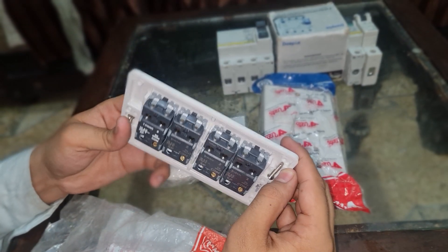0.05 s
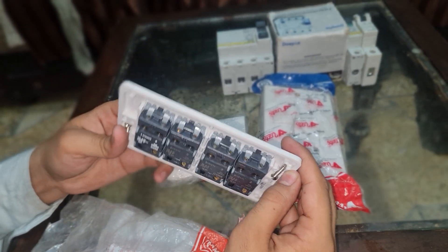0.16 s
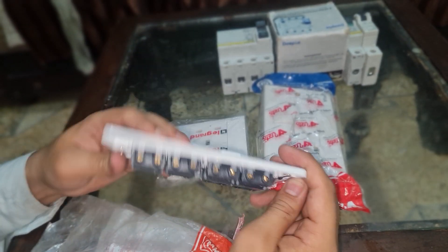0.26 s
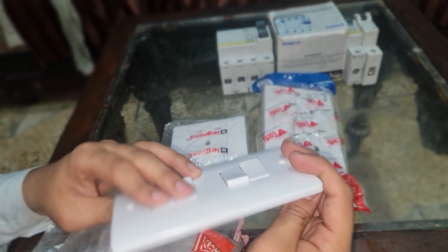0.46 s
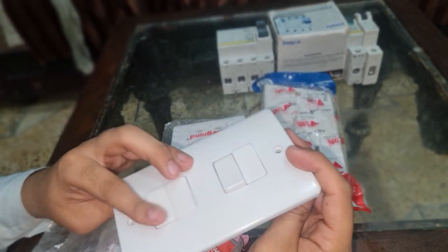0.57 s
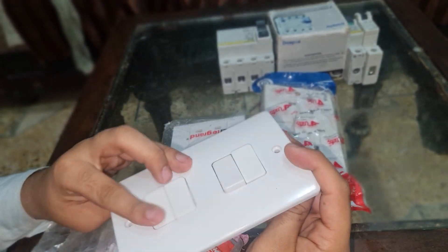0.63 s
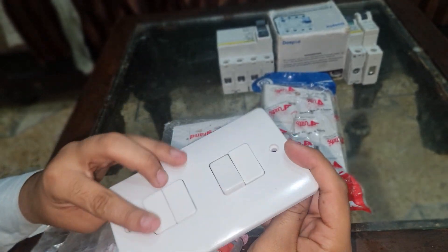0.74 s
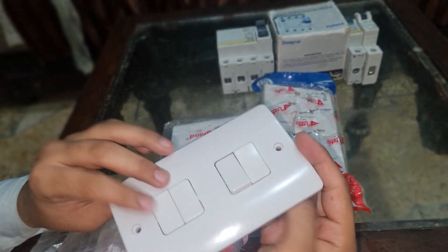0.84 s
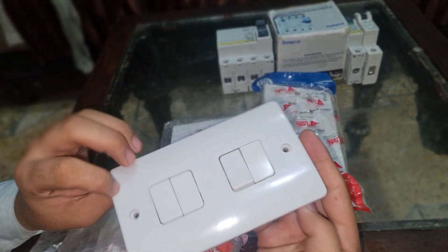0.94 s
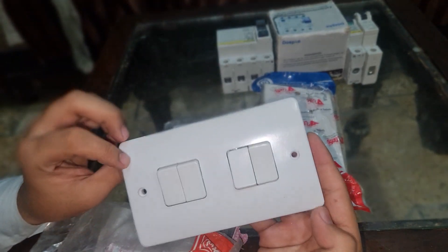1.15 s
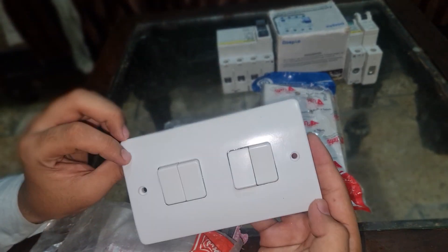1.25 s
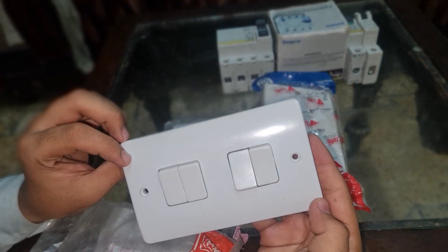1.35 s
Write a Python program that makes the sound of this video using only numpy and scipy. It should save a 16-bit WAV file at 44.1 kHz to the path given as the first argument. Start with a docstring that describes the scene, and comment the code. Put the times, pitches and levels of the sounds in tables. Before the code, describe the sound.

One sharp rocker switch snap, then soft finger scuffs over a low room hum.

```python
"""The echo of an earlier snap fades in a hard-walled room, over high cricket-like chirps, mains hum with its
overtones, a low rumble, a thin fan-like whine and a low rush of air, all of which carry on behind. At 0.21 s a
rocker switch on a hand-held plastic wall plate snaps over, close to the microphone: the rocker hits its stop,
the plastic rings and the room answers. Then the handled plate bumps softly, and fingers scuff, tap and brush
it."""
import sys
import numpy as np
from scipy import signal
from scipy.fft import rfft, irfft
from scipy.io import wavfile
from scipy.ndimage import uniform_filter1d

SR = 44100
rng = np.random.default_rng(int(sys.argv[2]) if len(sys.argv) > 2 else 0)


def unload_audio(sound):
    """Save the sound as a 16-bit wav file, at the path given as the first command line argument."""
    columns = np.transpose(np.atleast_2d(sound))
    # keep every value between -1 and 1, then stretch to whole-number steps
    steps = np.round(np.clip(columns, -1, 1) * 32767)
    wavfile.write(sys.argv[1], SR, steps.astype(np.int16))


N = 61740
LEAD_S = .3  # run-up for sounds that start before time zero
TOTAL = N + round(LEAD_S * SR)
TIME_S = np.arange(TOTAL) / SR - LEAD_S


def amp(db):
    """Decibels to gain."""
    return 10 ** (np.asarray(db) / 20)


def unit_rms(x):
    """Scales to rms 1."""
    return x / np.sqrt(np.mean(abs(x) ** 2) + 1e-20)


def lookup(points, hz, column=1):
    """Interpolates a table column over log frequency."""
    table = np.array(points, float)
    return np.interp(np.log(hz + 1), np.log(table[:, 0] + 1), table[:, column])


def pan(db):
    """Stereo gains: left up by db, right down by db."""
    return amp([[db], [-db]])


def decay(age_s, t60_s):
    """Exponential fall, 60 dB per t60_s."""
    return np.exp(-np.log(1000) * age_s / t60_s)


def swell(centre_s, sigma_s):
    """Gaussian envelope on the scene's time axis."""
    return np.exp(-.5 * ((TIME_S - centre_s) / sigma_s) ** 2)


def add(mix, start_s, sound):
    """Adds a stereo sound to the mix."""
    part = mix[:, max(round((start_s + LEAD_S) * SR), 0):][:, :sound.shape[1]]
    part += sound[:, :part.shape[1]]


def coloured(x, spectrum):
    """Filters x by a spectrum (one gain column, or one per channel), to rms 1."""
    size = x.shape[-1]
    hz = np.fft.rfftfreq(size, 1 / SR)
    gain = amp([lookup(spectrum, hz, column) for column in range(1, len(spectrum[0]))])
    return unit_rms(irfft(rfft(x) * gain, size))


def resonance(centre_hz, width_hz, size=TOTAL):
    """A resonance driven by noise, at rms 1."""
    detune = (np.fft.rfftfreq(TOTAL, 1 / SR) - centre_hz) / (.8 * width_hz)
    spectrum = rfft(rng.standard_normal(TOTAL)) / (1 + detune ** 2)
    return unit_rms(irfft(spectrum, TOTAL)[:size])


# room decay: freq_hz, t60_s
ROOM_DECAY = [(300, 0.73), (1300, 0.3), (2400, 0.37), (3600, .52), (6000, 0.45), (8500, 0.5), (11000, .42),
              (15000, 0.348)]


def room(x, predelay_s=.003, early_db=6.5, early_s=.025):
    """Dense wall reflections, strongest early on, each band dying at its own rate."""
    t = np.arange(int(.8 * SR)) / SR
    reflections = rng.standard_normal((2, len(t))) * amp(early_db * np.exp(-t / early_s))
    hz, age_s, bands = signal.stft(reflections, SR, nperseg=256)
    t60_s = lookup(ROOM_DECAY, hz)[:, None]
    energy_norm = np.sqrt(2 * np.log(1000) / (t60_s * SR))
    bands = bands * decay(age_s, t60_s) * energy_norm
    tail = signal.istft(bands, SR, nperseg=256)[1][:, :len(t)] * (t > predelay_s)
    return signal.fftconvolve(x.mean(0)[None], tail, axes=1)[:, :TOTAL]


# hit on the stop, then rebound: delay_s, gain_db
CONTACTS = [(0, 1), (.0015, -11)]
# modes of rocker and plate: freq_hz, left_db, right_db, t60_s
PLATE_MODES = [(1373, -33.5, -38, 0.0197), (3151, -14, -24.5, 0.02), (3723, -8, -44, 0.0068),
               (4310, -13, -30, .009), (5420, -17, -4.5, 0.0072), (5856, -4.5, -10.5, 0.0087),
               (6200, -17.5, -17, 0.012), (7700, -36, -25, .008), (8242, -23, -8, 0.0083),
               (11505, -16, -30, .01), (11780, -23, -22, 0.0084), (12600, -19, -25.5, 0.0083),
               (14350, -18, -27.5, 0.03), (15340, -24.5, -31.5, 0.0075)]
# contact crack spectrum: freq_hz, left_db, right_db
CRACK_SPECTRUM = [(100.2, -11.5, -26.5), (700, -11.5, -14), (1401.4, -11, -15), (2410, -13, -16),
                  (3130, 3, -14.5), (3700, -5, -17), (4500, -4.5, -0.5), (5900, -4, 1.5), (9200, -2, -3),
                  (10500, -4, -10), (12500, -0.5, -12), (16000, -5, -15)]


def snap(rise_s=.0003, right_lag_s=.00017, crack_db=-11, recoil_db=-31, recoil_hz=130):
    """The rocker hits its stop and rebounds: short plastic modes, a gritty crack, a low recoil."""
    t = np.arange(2048) / SR
    out = np.zeros((2, len(t)))
    for delay_s, gain_db in CONTACTS:
        age_s = np.maximum(t - delay_s - np.array([[0], [right_lag_s]]), 0)
        attack = 1 - np.exp(-age_s / rise_s)
        for k, (hz, left_db, right_db, t60_s) in enumerate(PLATE_MODES):
            ring = (-1) ** k * np.sin(2 * np.pi * hz * age_s) * decay(age_s, t60_s)
            out += amp(gain_db) * amp([[left_db], [right_db]]) * ring * attack
    crack = coloured(rng.standard_normal(out.shape), CRACK_SPECTRUM)
    out += amp(crack_db) * crack * decay(t, t60_s=.013) * (1 - np.exp(-t / rise_s))
    out[0] += amp(recoil_db) * np.sin(2 * np.pi * recoil_hz * t) * decay(t, t60_s=.02)  # left only
    return out


# rocker snaps: start_s, gain_db
SNAPS = [(-.21, 3.5), (0.2143, 1)]
# reflections off table and hands: delay_s, left_db, right_db
NEAR_REFLECTIONS = [(.005, -29, -19), (.0098, -28, -21.5), (.0132, -25, -23), (.0174, -24.5, -22.5)]
# plate radiation as the room returns it: freq_hz, left_db, right_db
ECHO_SPECTRUM = [(300, -14.5, -14.5), (885, -11.5, -12.5), (1340, -1.5, 0.5), (1750, -10, -9.5),
                 (2333, -2, 0), (2800, -4, -4), (3060, 3.5, 5), (3392, 2, 3.5), (4600, -1, 4.5),
                 (5960, 4.5, 14), (6900, -4, 5.5), (8570, -6, 8), (10800, -13.5, 0), (13500, -9, -0.5),
                 (15500, -7.5, -6)]


def switch():
    """Each snap arrives directly, off nearby surfaces and as a diffuse room echo."""
    close, impulses = np.zeros((2, 2, TOTAL))
    for start_s, gain_db in SNAPS:
        click = amp(gain_db) * snap()
        add(close, start_s, click)
        for delay_s, left_db, right_db in NEAR_REFLECTIONS:
            add(close, start_s + delay_s, amp([[left_db], [right_db]]) * click)
        add(impulses, start_s, amp(gain_db) * np.ones((2, 1)))
    hz = np.fft.rfftfreq(TOTAL, 1 / SR)
    echo_gain = amp([lookup(ECHO_SPECTRUM, hz, column) for column in (1, 2)])
    return close + irfft(rfft(room(impulses)) * echo_gain, TOTAL)


# chirps: start_s, length_s, pitch_hz, level_db
CHIRPS = [(-.03, 0.063, 4160, -59), (.178, .025, 4420, -53), (0.648, 0.085, 3920, -64.5),
          (.9, 0.105, 4090, -66.5), (1.093, 0.017, 4185, -50), (1.125, 0.081, 4157, -57.5),
          (1.302, .05, 4090, -69)]
# chirp partials: pitch_ratio, width_hz, gain_db
CHIRP_PARTIALS = [(1, 170, -3), (1.98, 370, -17), (2.98, 500, -15.5), (3.5, 400, -29)]


def chirps(edge_s=.004, tilt_db_per_db=.45, zero_tilt_db=-43, room_db=3, pan_db=-5.5):
    """Shrill, rough chirps of narrow noise bands, brighter when louder, hanging in the room."""
    out = np.zeros((2, TOTAL))
    for start_s, length_s, pitch_hz, level_db in CHIRPS:
        t = np.arange(0, length_s, 1 / SR)
        gate = np.clip(np.minimum(t, length_s - t) / edge_s, 0, 1)
        tilt_db = tilt_db_per_db * (level_db - zero_tilt_db)
        tone = sum(amp(gain_db + tilt_db * (ratio - .5)) * resonance(pitch_hz * ratio, width_hz, len(t))
                   for ratio, width_hz, gain_db in CHIRP_PARTIALS)
        add(out, start_s, amp(level_db) * gate * tone * pan(pan_db))
    return out + amp(room_db) * pan(pan_db) * room(out)


# mains hum envelope: time_s, relative_db
MAINS_ENVELOPE = [(0.0, -48.5), (0.084, -58.5), (0.412, -51.5), (0.79, -50), (0.834, -59), (0.962, -50),
                  (1.044, -56.5), (1.114, -52.5), (1.146, -59.5), (1.4, -50)]


def mains_hum(pitch_hz=100.1, waver=.33, gain_db=-1.5, pan_db=-1.44):
    """A low, wavering mains tone that swells and dips."""
    tone = np.sqrt(2) * np.sin(2 * np.pi * pitch_hz * TIME_S) + waver * resonance(pitch_hz, width_hz=12)
    level_db = np.interp(TIME_S, *np.transpose(MAINS_ENVELOPE)) + gain_db
    return amp(level_db) * tone * pan(pan_db)


# rumble, hum overtone and whine lines: freq_hz, width_hz, level_db, pan_db
HUM_LINES = [(39, 5, -62, -5), (198.56, 3, -64.5, 1), (301.8, 4, -68.5, -0.5), (410.8, 23, -66, 1.5),
             (601, 24, -67, 5), (1943.3, 31, -68.5, 4), (3980, 200, -71.5, -1.5)]


def hum_lines():
    """Narrow noise bands waver as a low rumble, the overtones of the hum and a thin fan-like whine."""
    return sum(amp(level_db) * pan(pan_db) * resonance(hz, width_hz)
               for hz, width_hz, level_db, pan_db in HUM_LINES)


# air spectrum: freq_hz, relative_db
AIR_SPECTRUM = [(20, -20.5), (55, -8.5), (80, -12.5), (135, -9), (230, -12), (420, -10.5), (520, -14.5),
                (680, -13), (880, -24.5), (1600, -21.5), (2200, -22.5), (2700, -28.5), (3600, -29.5),
                (4800, -36.5), (6000, -39.5), (9000, -50), (16000, -59)]
# left-right likeness of the air: freq_hz, correlation
AIR_CORRELATION = [(60, 1), (180, 0.9), (550, 0.43), (1650, -0.32), (4970, -0.31), (15000, 1)]


def air(level_db=-53, patch_db=1, pan_db=-.78):
    """Low rush of moving air, slightly patchy, nearly mono in the bass."""
    hz = np.fft.rfftfreq(2048, 1 / SR)
    left_re, left_im, other_re, other_im, patches = rng.standard_normal((TOTAL // 512 + 5, len(hz), 5)).T
    patches = uniform_filter1d(patches, size=20, axis=0)  # across frequency
    patches = unit_rms(uniform_filter1d(patches, size=8, axis=1))  # across time
    correlation = lookup(AIR_CORRELATION, hz)[:, None]
    left = left_re + 1j * left_im
    right = correlation * left + np.sqrt(1 - correlation ** 2) * (other_re + 1j * other_im)
    bands = np.array([left, right]) * amp(lookup(AIR_SPECTRUM, hz)[:, None] + patch_db * patches)
    rush = signal.istft(bands, nperseg=2048, noverlap=1536)[1][:, :TOTAL]
    return amp(level_db) * pan(pan_db) * unit_rms(rush)


# handling bumps: centre_s, pitch_hz, level_db
BUMPS = [(.39, 39.3, -44.5), (1.097, 70, -46), (1.349, 58, -53.5)]


def bumps(width_cycles=.8):
    """Handling the plate gives brief, soft pushes of low sound."""
    out = np.zeros(TOTAL)
    for centre_s, pitch_hz, level_db in BUMPS:
        cycles = pitch_hz * (TIME_S - centre_s)
        out += amp(level_db) * np.sin(2 * np.pi * cycles) * np.exp(-(cycles / width_cycles) ** 2)
    return out


# finger scuffs: centre_s, sigma_s, rub_db, squeak_db
SCUFFS = [(0.424, 0.0017, -52.5, -54.5), (0.549, 0.008, -66.5, -68), (.861, 0.0061, -62, -61.5),
          (1.048, 0.0068, -56.5, -63.5), (1.062, .005, -54.5, -73)]
# rub spectrum: freq_hz, relative_db
RUB_SPECTRUM = [(400, 0), (1300, 6.5), (2200, 1.5), (3000, 4), (3900, -6), (4700, -3.5), (5200, -0.5),
                (5900, 0), (7500, -4), (9800, -10.5), (11500, -16), (15000, -29.5)]
# squeak resonances: freq_hz, width_hz, gain_db
SQUEAK_MODES = [(2954, 110, -2.5), (5880, 150, -1), (7000, 240, -17)]


def scuffs(slips_per_s=5000):
    """Brief swells of tiny finger slips rub the plastic and make it squeak."""
    slips = rng.standard_normal((2, TOTAL)) * (rng.random(TOTAL) < slips_per_s / SR)
    rub = coloured(slips, RUB_SPECTRUM)
    squeak = sum(amp(gain_db) * resonance(hz, width_hz) for hz, width_hz, gain_db in SQUEAK_MODES)
    return sum((amp(rub_db) * rub + amp(squeak_db) * squeak) * swell(centre_s, sigma_s)
               for centre_s, sigma_s, rub_db, squeak_db in SCUFFS)


# tap spectrum: freq_hz, relative_db
TAP_SPECTRUM = [(1500, -24), (2900, -11), (3800, -1), (5000, 3.5), (6200, -7), (7200, -6), (8300, -15),
                (9600, -7.5), (11500, -33)]


def tap(level_db=-47.5, rise_s=.0008):
    """A fingertip strikes the plate lightly: a short noise burst."""
    t = np.arange(2048) / SR
    envelope = (1 - np.exp(-t / rise_s)) * decay(t, t60_s=.027)
    return amp(level_db) * envelope * coloured(rng.standard_normal((2, len(t))), TAP_SPECTRUM)


def brush(level_db=-79.5):
    """A fingertip brushes across the plate: a faint, high hiss."""
    return amp(level_db) * resonance(centre_hz=9800, width_hz=4000) * swell(centre_s=.99, sigma_s=.045)


def fingers(pan_db=-6, room_db=-1.5):
    """Scuffs, tap and brush, to the right, with their room echo."""
    touches = scuffs()
    add(touches, start_s=.5445, sound=tap())
    touches += brush()
    return touches * pan(pan_db) + amp(room_db) * room(touches)


def scene():
    """Switch and handling in front; chirps, hum with its overtones, rumble, whine and air behind."""
    front = switch() + fingers() + bumps()
    behind = chirps() + mains_hum() + hum_lines() + air()
    return (front + behind)[:, -N:]


def record(dry):
    """Clip at full scale, then low-pass at 15.9 kHz."""
    lowpass = signal.firwin(255, 15900, window=("kaiser", 9), fs=SR)
    return signal.oaconvolve(np.clip(dry, -1, 1), lowpass[None], "same")


dry = scene()
out = record(dry)
unload_audio(out)
```